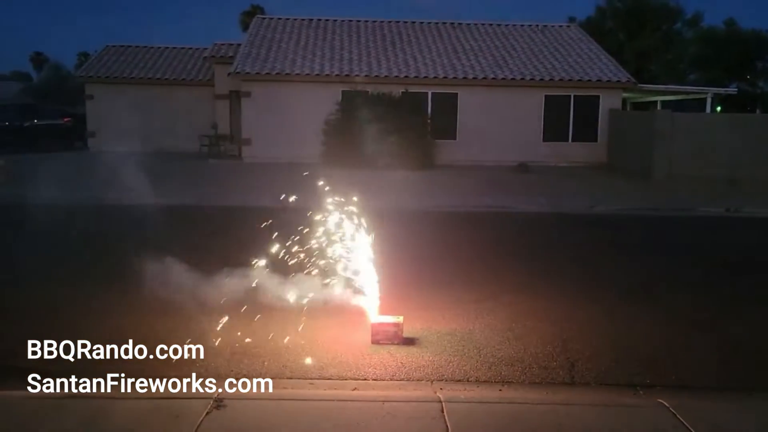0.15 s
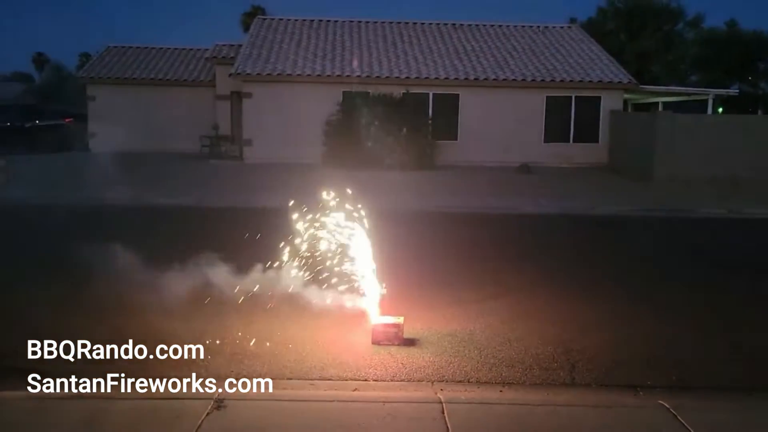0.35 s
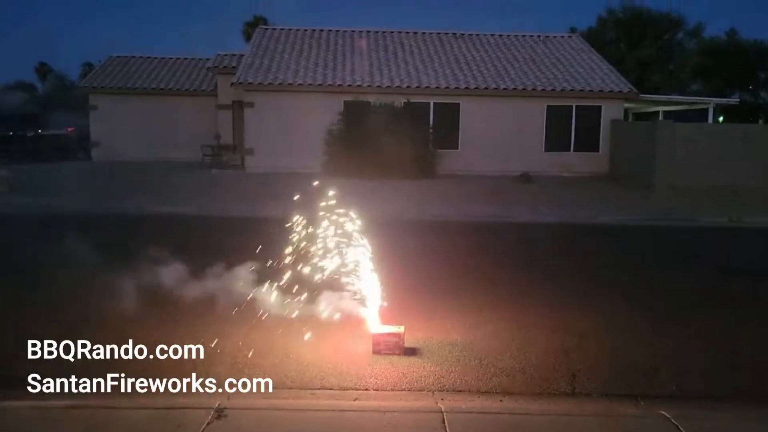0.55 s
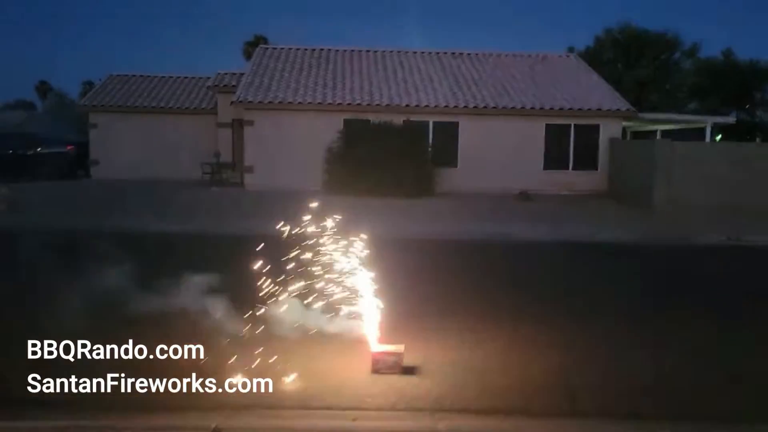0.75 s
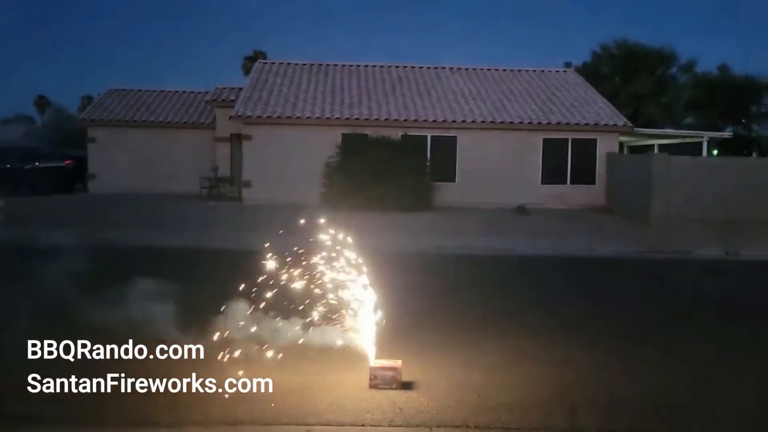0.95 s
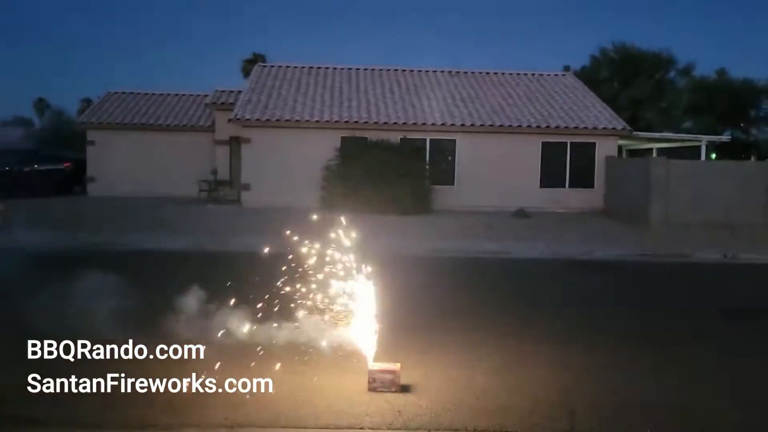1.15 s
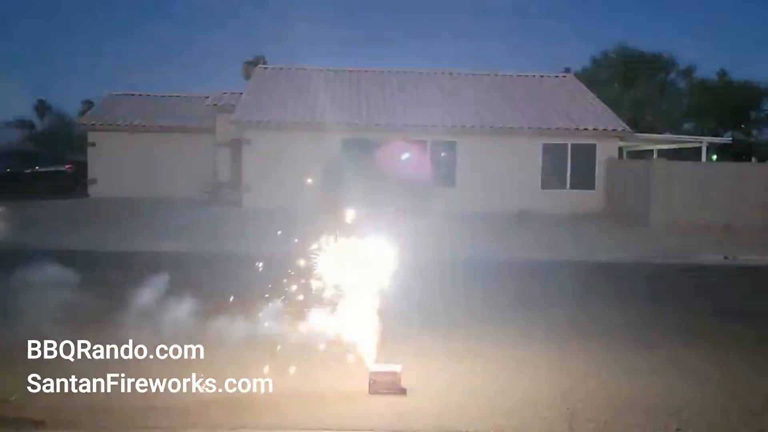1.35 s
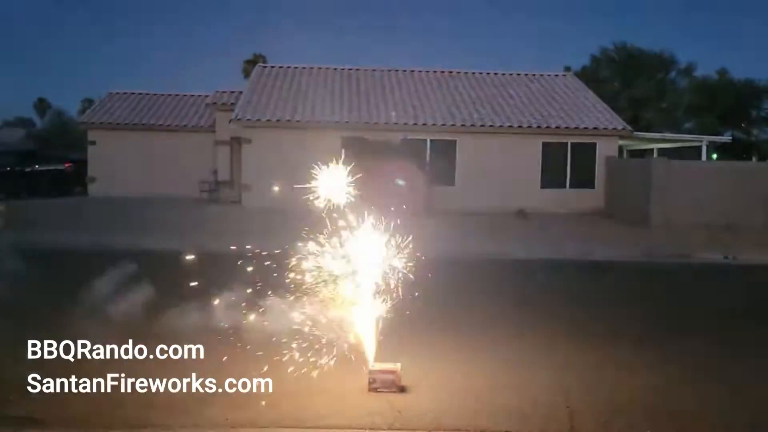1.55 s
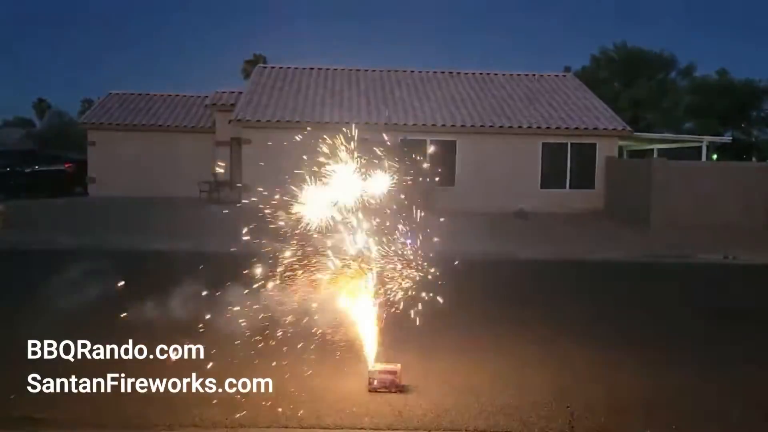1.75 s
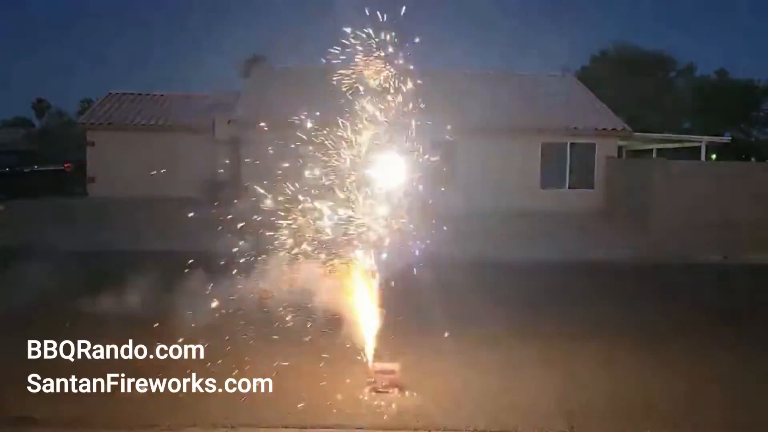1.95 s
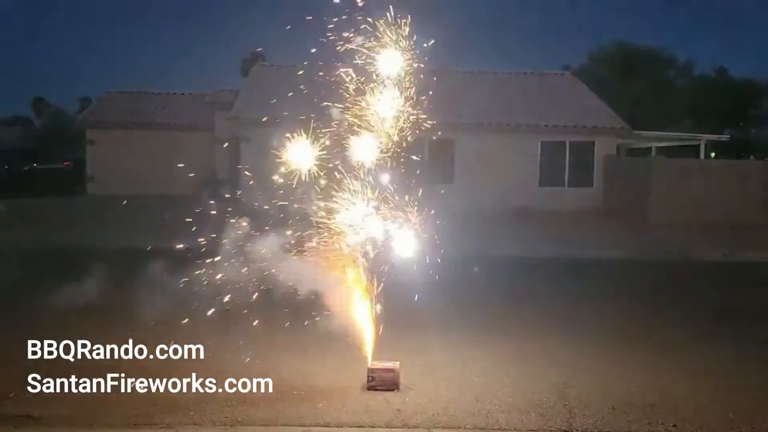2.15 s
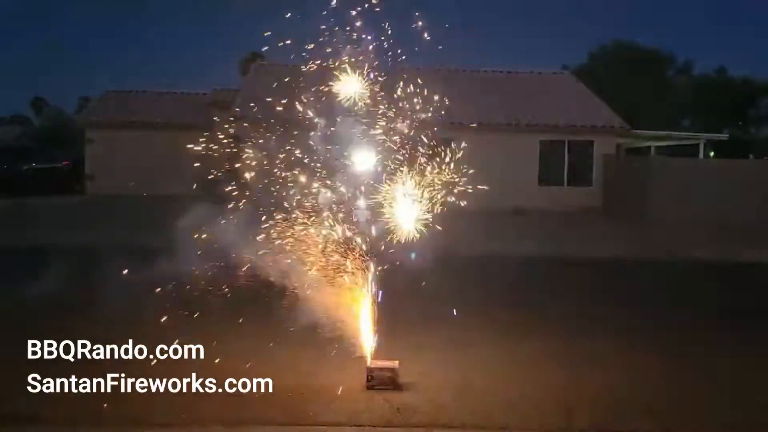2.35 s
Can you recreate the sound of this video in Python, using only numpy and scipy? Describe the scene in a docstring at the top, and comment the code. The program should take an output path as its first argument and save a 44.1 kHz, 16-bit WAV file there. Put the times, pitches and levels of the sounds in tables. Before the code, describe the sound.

A ground firework fountain sprays with a rushing, sputtering sound that turns into a growing hiss, then throws dense swarms of pops and loud snaps. It is heard in stereo from a few metres, outdoors over a faint neighbourhood rumble.

```python
"""A street in front of a house, with a firework fountain a few metres from a stereo microphone.
The jet flares, roars and spits for a second, then the next charge takes over with a swelling hiss.
From 1.5 s it throws crackling stars, each bursting into a swarm of tiny pops, with loud cracks and
a few low thuds among them. Road and house throw the crackle back; the neighbourhood rumbles below."""
import sys
import numpy as np
from scipy import signal
from scipy.fft import rfft, irfft, next_fast_len
from scipy.io import wavfile
from scipy.ndimage import uniform_filter1d

SR = 44100
rng = np.random.default_rng(int(sys.argv[2]) if len(sys.argv) > 2 else 0)


def unload_wav(signal):
    """Save mono or channel-first audio to the path in sys.argv[1] as 16-bit WAV at rate SR, clipped to [-1, 1]."""
    wavfile.write(
        sys.argv[1],
        SR,
        np.round(np.clip(np.atleast_2d(signal).T, -1, 1) * 32767).astype(np.int16),
    )


N = 110250
T = np.arange(N) / SR
FILTER_HZ = np.fft.rfftfreq(4096, 1 / SR)
BAND_LIMIT_HZ = 15790


def amp(db):
    """Decibels to gain."""
    return 10 ** (np.asarray(db) / 20)


def unit(x):
    """Scales to rms 1."""
    return x / np.sqrt(np.mean(x ** 2) + 1e-20)


def curve(points, at):
    """Reads a two-column table along straight lines."""
    return np.interp(at, *np.transpose(points))


def spectrum(table, hz):
    """Reads every column of a table on a log-frequency axis."""
    table_hz, *columns = np.transpose(table)
    return [np.interp(np.log(hz + 1), np.log(table_hz + 1), column) for column in columns]


def add(mix, start_s, sound):
    """Adds a sound into the mix at start_s."""
    part = mix[..., round(start_s * SR):][..., :sound.shape[-1]]
    part += sound[..., :part.shape[-1]]


def colour(x, gain):
    """Minimum-phase filter with each channel's gains given at FILTER_HZ."""
    log_gain = np.log(np.maximum(gain, 1e-5))
    mirrored = np.concatenate([log_gain, log_gain[:, -2:0:-1]], axis=1)
    taps = np.fft.ifft(np.exp(np.conj(signal.hilbert(mirrored)))).real
    return signal.fftconvolve(x, taps, axes=1)[:, :N]


def turbulence(table, patch_db, flutter_db, edge=None, size=512):
    """Coloured stereo noise with drifting patches and a flutter shared by all bands."""
    hop = size // 4
    frames, hz = N // hop + 6, np.fft.rfftfreq(size, 1 / SR)
    a, b, c, d, patches = rng.standard_normal((5, frames, len(hz)))
    shared, apart = a + 1j * b, c + 1j * d
    patches = unit(uniform_filter1d(uniform_filter1d(patches, size=14, axis=0), size=7, axis=1))
    flutter = unit(uniform_filter1d(rng.standard_normal(frames), size=4))[:, None]
    level, balance, likeness = spectrum(table, hz)
    lean = amp(balance)
    bins = np.array([lean * shared, likeness * shared + np.sqrt(1 - likeness ** 2) * apart])
    bins *= amp(level + patch_db * patches + flutter_db * flutter) / np.sqrt(1 + lean ** 2)
    if edge is not None:  # a 7 dB dip, 400 Hz above the moving edge
        edge_hz = curve(edge, np.arange(frames) * hop / SR)[:, None]
        bins *= amp(-7 * np.exp(-((hz - edge_hz - 400) / 380) ** 2))
    return unit(signal.istft(bins.swapaxes(1, 2), nperseg=size, noverlap=size - hop)[1][:, :N])


# The first charge at the microphone (time [s], level [dB])
ROAR_LEVEL = [(0, -35.5), (.06, -33.5), (.27, -35), (.34, -32), (.47, -33.5), (.62, -33), (.72, -33.5),
              (.82, -31), (.97, -35), (1.015, -40.5), (1.15, -49), (1.4, -63)]
# Upper edge of the roar, rising as the nozzle heats (time [s], frequency [Hz])
ROAR_EDGE = [(0, 2050), (.2, 2470), (.35, 3100), (1, 2970)]
# Its colour (frequency [Hz], relative level [dB], left over right [dB], left-right likeness [0-1])
ROAR_COLOUR = [(50, -16, -1, 0.7), (139, -3, -.5, 1), (235, -0.5, -1.5, 0.95), (300, -2.5, 1, 0.74),
               (385, 2, 0, 0.87), (486, -4, -7, .5), (557, -7, 7, .3), (640, -1.5, -2, 0.62),
               (745, -1, -4, 0.76), (840, -9, 0, 0.2), (1020, -12.5, 1, 0.1), (1240, -3, 0, .7),
               (1810, -0.7, 3.5, 0.86), (2395, 1.5, 11.5, .6), (2770, -7, 15, 0.1), (2870, -5.5, 9, 0.2),
               (3000, -12, 2, 0.2), (3900, -7, 1.2, 0.8), (4640, -13.5, -4.5, 0.88),
               (5600, -19, -0.5, 0.87), (7100, -23.5, 1, 0.4), (9100, -22.5, 8.5, .5),
               (11600, -32.5, -2, .1), (12900, -25.5, -1.6, .04), (15500, -28, 1, .1)]


def roar():
    """The first charge drives a turbulent jet out of the nozzle for a second."""
    noise = turbulence(ROAR_COLOUR, patch_db=1.0, flutter_db=.6, edge=ROAR_EDGE, size=1024)
    return noise * amp(curve(ROAR_LEVEL, T))


# The opening flare at the microphone (time [s], level [dB])
FLARE_LEVEL = [(0, -44), (.1, -47), (.22, -52), (.33, -69), (.6, -85)]
# Its colour (frequency [Hz], relative level [dB], left over right [dB], left-right likeness [0-1])
FLARE_COLOUR = [(2500, -25, 2, .6), (3400, -2, -15, 0.62), (4200, 10.5, -15, 0.36), (5500, -13, 10, 0.43),
                (7100, 2.5, -1, 0.26), (9500, -15, 1, .3), (12000, -23, -3, .2), (16000, -13, 2, .2)]


def flare():
    """A brighter, fluttering hiss rides on the jet and is gone in a third of a second."""
    return turbulence(FLARE_COLOUR, patch_db=1.0, flutter_db=2.0) * amp(curve(FLARE_LEVEL, T))


# Street ambience (frequency [Hz], relative level [dB], left over right [dB], left-right likeness [0-1])
RUMBLE_COLOUR = [(20, -30, -2, .7), (38, -9.5, -2, 1), (58, 0, -1, 1), (85.4, -2.5, -1.2, 0.74),
                 (129, -5.5, -2, 1), (216, -11.5, -0.81, 0.92), (390, -17, -1.7, 0.2),
                 (910, -13.5, 0, 0.11), (4000, -38, 0, .2)]


def rumble():
    """The neighbourhood's low, steady rumble."""
    return amp(-45) * turbulence(RUMBLE_COLOUR, patch_db=.7, flutter_db=.4, size=4096)


# A pop from a few metres away (frequency [Hz], relative level [dB], left over right [dB])
POP_COLOUR = [(151, -9, -0.5), (267, -10, 1), (370, -7, .5), (545, -13, -3), (760, -6.5, 1),
              (1020, -6.5, -0.5), (1340, -3, 2), (1770, -1.2, -0.5), (2350, -2.5, 2.5), (2870, -3.5, 4),
              (3420, -1.5, 5.5), (3820, -3.5, 2.5), (4270, -5, -4), (4900, -1, -4.5), (5600, 1.5, -3),
              (7340, -1.5, -1), (8540, -10.5, 7.5), (9500, -8.5, 3.5), (11500, -11.5, 4), (12900, -1, 2),
              (16700, -5, 2.5)]


def pop_gains(band=1):
    """The colour shared by spits, pops and cracks, weighted by band and scaled to rms 1."""
    level, balance = spectrum(POP_COLOUR, FILTER_HZ)
    low_cut = 1 / np.sqrt(1 + (70 / (FILTER_HZ + 1)) ** 4)
    high_cut = np.where(FILTER_HZ < BAND_LIMIT_HZ, 1, .1)
    return unit(amp(level) * amp([balance / 2, -balance / 2]) * low_cut * high_cut * band)


def snaps(table):
    """Each is a sharp spike and a short tearing burst, partly different at the two microphone ports."""
    out, t = np.zeros((2, N)), T[:256]
    for start, db, decay_s in table:
        shared, *per_port = np.tanh(rng.standard_normal((3, len(t))))
        burst = (shared + .8 * np.array(per_port)) * t / decay_s * np.exp(-t / decay_s)
        burst[:, 0] -= .5  # the spike
        add(out, start, amp(db) * burst / np.linalg.norm(burst, axis=1, keepdims=True))
    return out


# Spits at the nozzle (time [s], relative level [dB], decay [s])
NOZZLE_SPITS = [(.3255, -23.5, .0005), (.378, -23, .0005), (.6083, -20, .0005), (.6105, -21, .0005),
                (.6368, -22.5, .0004), (.7748, -26, .0004), (.7768, -21.5, .0005), (.783, -19.5, .0006),
                (.795, -27, .0003), (.839, -25, .0005), (.919, -28, .0003), (.9456, -24.5, .0005),
                (.951, -26, .0006), (.9624, -26, .0004), (.98, -28, .0002), (1.4765, -17, .0003),
                (1.5203, -18, .0002)]


def spits():
    """The nozzle spits in small snaps, duller than the cracks."""
    dulling = 1 + (FILTER_HZ / 7000) ** 2
    return amp(14.5) * colour(snaps(NOZZLE_SPITS), pop_gains() / dulling)


# The second charge at the microphone (time [s], level [dB])
HISS_LEVEL = [(.9, -65), (1.02, -39.5), (1.15, -36.5), (1.27, -33.5), (1.44, -32), (1.52, -28.5),
              (1.7, -29), (2.5, -27.5)]
# Its colour (frequency [Hz], relative level [dB], left over right [dB], left-right likeness [0-1])
HISS_COLOUR = [(60, -31, 2, 0.9), (199, -12, -6, 0.78), (513, -15.5, -6, .15), (744, -6, -1, .99),
               (990, -13.5, -2, 0.2), (1790, 0, 1, .76), (2420, 5.5, 7, 0.9), (2980, -2, 7.5, 0.51),
               (3300, -12.5, 0, 0.4), (4440, -5.5, 1, 0.88), (5370, -3.5, -6.5, 0.89), (5840, -10, -1, .98),
               (6280, -6, -5, 0.99), (6900, -5.5, 4, 0.84), (7900, -10, 4, .46), (8440, -21, 14, .43),
               (8950, -12, 3, .74), (9700, -13.5, 0, .7), (11300, -26.5, 2, .55), (13200, -14, -1, .78),
               (14500, -13.5, 1, .5), (15600, -20, 2.8, .19)]


def hiss():
    """The second charge's jet swells into a hiss as the roar dies."""
    return turbulence(HISS_COLOUR, patch_db=1.5, flutter_db=.6) * amp(curve(HISS_LEVEL, T))


def pops(samples, per_s, bounce_s, spread_db=2.9, spray_width_s=34e-6):
    """Uneven pops, each from its own direction in the spray, echoed by the road about bounce_s later."""
    count = max(int(samples * per_s / SR), 3)
    when, size, side, sign, scatter = rng.random((count, 5)).T
    strength = amp(spread_db * np.minimum(-np.log(size), 3.5)) * np.sign(sign - .5)
    port_lag = spray_width_s * SR * np.log(side / (1 - side)) / 2
    road_delay = bounce_s * SR * (1 + .08 * (scatter - .5))
    out = np.zeros((2, samples + 400))
    for delay, gain in ((0, 1), (road_delay, amp(-5))):
        for port in (0, 1):
            arrival = (when * samples + delay + (port - .5) * port_lag)[:, None]
            index = arrival.astype(int) + np.arange(-5, 7)
            clicks = gain * strength[:, None] * np.sinc(index - arrival)  # lands between samples
            np.add.at(out[port], np.clip(index, 0, samples + 399), clicks)
    return unit(out[:, :samples])


# Stray sparks in the spray, faint until the stars come (time [s], level [dB])
STRAY_LEVEL = [(0, -62), (1, -66), (1.5, -40.5), (1.62, -49), (1.7, -33), (2.2, -29), (2.5, -40)]


def stray_sparks():
    """Loose sparks pop in the gaps between the stars."""
    sparks = pops(N, per_s=2000, bounce_s=.0019) * amp(curve(STRAY_LEVEL, T))
    return colour(sparks, pop_gains())


# Stars bursting over the street, with band levels relative to STAR_BAND_DB
# (time [s], length [s], body [dB], treble [dB], bass [dB], road echo delay [s])
STAR_BURSTS = [(1.544, .015, -26, -26.5, -63, 0.0016), (1.562, 0.0086, -36.5, -40, -51, 0.0025),
               (1.628, 0.017, -25, -27, -42, 0.0015), (1.65, 0.014, -31, -27, -46, 0.0016),
               (1.703, .044, -25.5, -22, -46, 0.0017), (1.749, 0.016, -31, -24.5, -39.5, 0.0026),
               (1.788, .012, -30.5, -31, -37, 0.0023), (1.813, 0.023, -28, -26, -33.5, .0017),
               (1.848, 0.013, -34.5, -25.5, -42, 0.0021), (1.873, 0.016, -33, -26, -47, 0.0024),
               (1.893, .028, -28.5, -21, -41.5, 0.0016), (1.935, 0.034, -24, -20, -37, 0.0026),
               (1.999, 0.023, -25, -21.5, -42.5, .0011), (2.033, 0.031, -23.5, -19.5, -33, 0.0029),
               (2.079, .019, -24, -22, -41, 0.0027), (2.105, 0.021, -29.5, -25, -33, .0022),
               (2.163, .014, -27, -26, -41, .0022), (2.178, .025, -22, -22.5, -33, .0022),
               (2.273, .033, -23, -24, -50, 0.0016), (2.298, 0.02, -26, -23, -36, .0027),
               (2.322, .033, -23, -21, -31, 0.0018), (2.353, .019, -24.5, -20, -37, 0.0026),
               (2.383, 0.034, -25, -23.5, -40, .0011), (2.445, 0.022, -27, -23.5, -37.5, 0.0031),
               (2.478, .008, -29.5, -32.5, -51, 0.0015)]
STAR_BAND_DB = (-7, -6.5, -8)  # body, treble, bass


def stars(rise_s=.0025, sag_db_per_s=75, fade_s=.0048):
    """Each star bursts into a swarm of tiny pops with its own mix of body, treble and bass."""
    above_bass = 1 / (1 + (300 / (FILTER_HZ + 1)) ** 4)
    treble = 1 / (1 + (3500 / (FILTER_HZ + 1)) ** 10)
    bands = [above_bass * (1 - treble), treble, 1 - above_bass]
    swarms = np.zeros((3, 2, N))
    for start, length, *levels, bounce_s in STAR_BURSTS:
        t = T[:int((length + .025) * SR)]
        envelope = np.minimum(t / rise_s, 1) * amp(-sag_db_per_s * t)
        envelope *= np.exp(-np.maximum(t - length, 0) / fade_s)
        swarm = unit(pops(len(t), per_s=4000, bounce_s=bounce_s) * envelope)
        swarm *= np.sqrt(len(t) / (length * SR))  # makes up for the quiet tail
        add(swarms, start, amp(levels)[:, None, None] * swarm)
    return sum(amp(db) * colour(x, pop_gains(band)) for x, band, db in zip(swarms, bands, STAR_BAND_DB))


# Cracks among the stars (time [s], relative level [dB], decay [s])
LOUD_CRACKS = [(1.5475, -5, .0004), (1.5503, -4, .0005), (1.568, -8.5, .0005), (1.634, -7, .0004),
               (1.6368, -10, .0003), (1.6562, -3.5, .0007), (1.7315, -12, .0002), (1.74, -9, .0001),
               (1.8155, -7, .0002), (1.8172, -2.5, .0004), (1.8194, -4.5, .0002), (1.8233, -6.5, .0003),
               (1.825, -5, .0003), (1.8304, -11, .0002), (1.856, -8.5, .0003), (1.8961, -9, .0002),
               (1.9978, -5.5, .0001), (2.0, -4, .0001), (2.0194, -9, .0002), (2.0363, -6, .0002),
               (2.0445, -3.5, .0005), (2.0805, -3, .0004), (2.0824, -.5, .0007), (2.1237, -6.5, .0002),
               (2.1255, -7, .0005), (2.1697, -6, .0002), (2.18, -9, .0002), (2.3095, -8, .0006),
               (2.365, -5, .0004), (2.3672, -4, .0006), (2.4817, -5, .0005)]


def cracks():
    """Single loud snaps stand out of the swarms."""
    return amp(7.5) * colour(snaps(LOUD_CRACKS), pop_gains())


# Thuds, centred between the ports (time [s], envelope peak [dB], pitch [Hz])
STAR_THUDS = [(1.567, -30.5, 100), (1.632, -28, 120), (2.188, -30, 190), (2.3075, -24, 115)]


def thuds(rise_cycles=.4):
    """The biggest stars push out a short puff of air."""
    out, t = np.zeros(N), T[:4000]
    for start, db, hz in STAR_THUDS:
        age = t * hz / rise_cycles
        add(out, start, amp(db) * np.sin(2 * np.pi * hz * t) * age * np.exp(1 - age))
    return out


# Reverberation in front of the house (frequency [Hz], time to fall 60 dB [s])
STREET_DECAY = [(100, 0.12), (1000, 0.13), (4000, 0.13), (15000, 0.2)]


def street_echoes(x, echoes_per_s=2000, first_echo_s=.004):
    """Sparse, short echoes from road, walls and house."""
    n = SR // 2
    taps = rng.standard_normal((2, n)) * (rng.random((2, n)) < echoes_per_s / SR)
    hz, t, bins = signal.stft(taps * (T[:n] > first_echo_s), SR, nperseg=256)
    t60 = spectrum(STREET_DECAY, hz)[0][:, None]
    tail = signal.istft(bins * amp(-60 * t / t60), SR, nperseg=256)[1]
    tail /= np.linalg.norm(tail, axis=1, keepdims=True)
    return signal.fftconvolve(x, tail, axes=1)[:, :N]


def scene():
    """Jet, crackle and the crackle's echoes reach the microphone over the neighbourhood's rumble."""
    crackle = stars() + cracks() + spits() + stray_sparks() + thuds()
    ambience = rumble()
    low_cut = signal.butter(2, 55, "highpass", fs=SR, output="sos")
    jet = signal.sosfilt(low_cut, roar() + hiss() + flare())
    return jet + crackle + amp(-9) * street_echoes(crackle) + ambience


# The microphone's left port against its right (frequency [Hz], phase lead [rad])
PORT_PHASE = [(0, 0), (300, .05), (700, .35), (2600, .35), (3000, 1.2), (3400, 3.6), (4400, 3.3),
              (5500, 2.5), (6800, 1.9), (7900, .8), (8800, -.4), (11000, 0), (16000, -.3)]


def record(dry):
    """The microphone's two ports differ in phase; loud peaks are rounded off and the top treble is cut."""
    size = next_fast_len(N + 4096)
    lead = curve(PORT_PHASE, np.fft.rfftfreq(size, 1 / SR))
    ported = irfft(rfft(dry, size) * np.exp(.5j * np.array([lead, -lead])), size)[:, :N]
    low_pass = signal.firwin(511, BAND_LIMIT_HZ, window=("kaiser", 8), fs=SR)
    return signal.oaconvolve(np.tanh(ported), low_pass[None], "same")


dry = scene()
out = record(dry)
unload_wav(out)
```